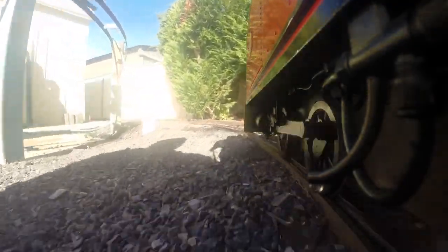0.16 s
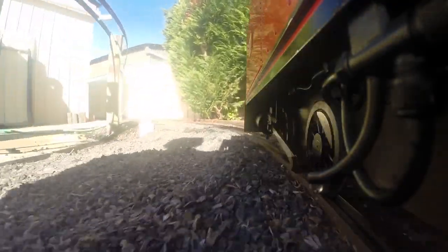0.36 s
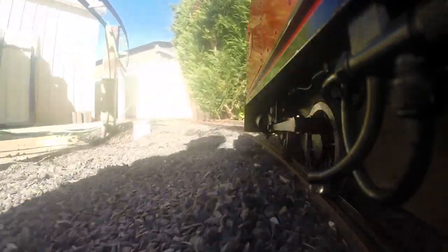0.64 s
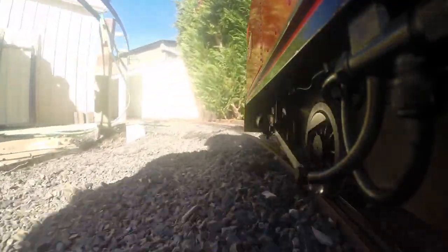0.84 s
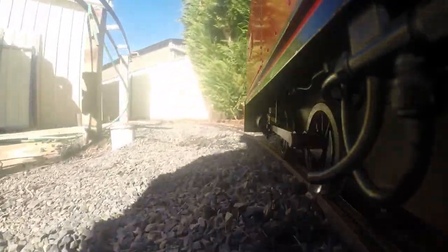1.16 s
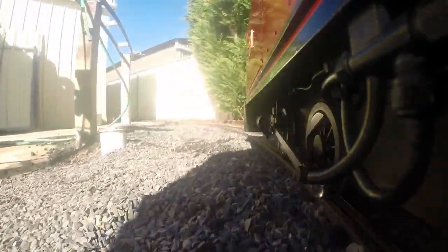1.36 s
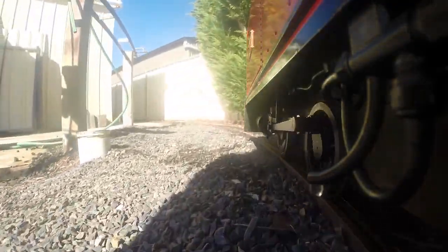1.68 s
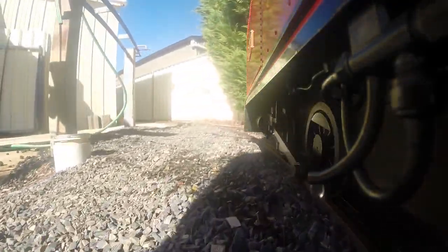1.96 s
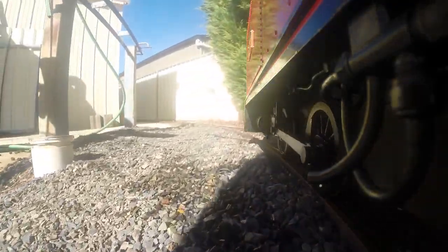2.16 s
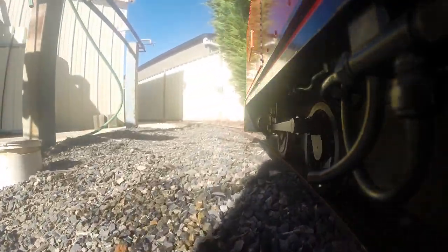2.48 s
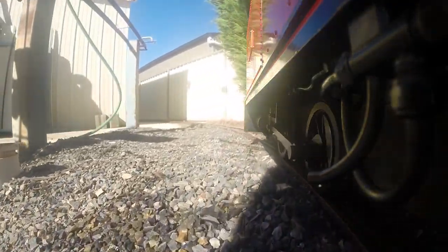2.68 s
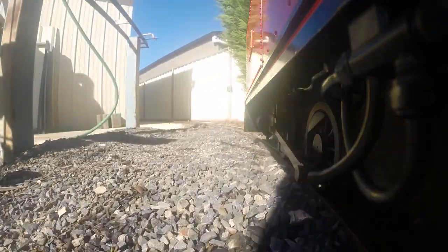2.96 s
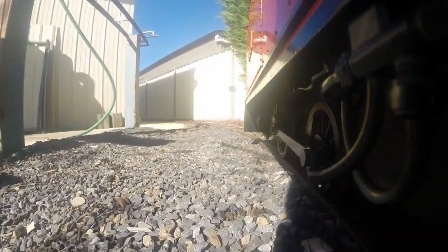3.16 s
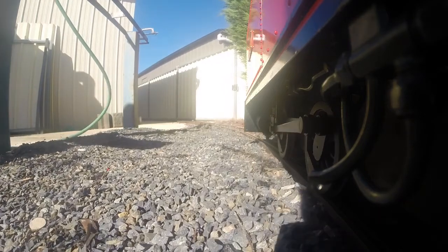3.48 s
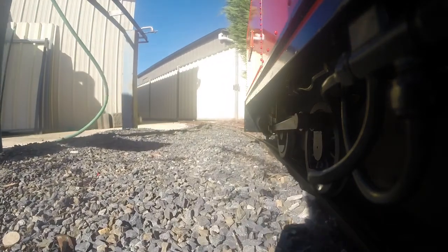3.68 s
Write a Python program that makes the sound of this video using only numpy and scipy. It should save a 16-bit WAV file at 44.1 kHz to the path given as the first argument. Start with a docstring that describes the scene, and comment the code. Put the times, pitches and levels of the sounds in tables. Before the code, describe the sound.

Close to the wheels outdoors, a small steam locomotive rumbles along the rails with busy metal clanks and cracking grit. The clanks become lighter and sparser, low thuds continue, and steam softly spits and hisses.

```python
"""Miniature steam locomotive rolling along a garden track, heard beside its wheels.
The wheels rumble through the frame, which sways on its springs and thuds at bumps. Loose rods and
couplings clank and rattle, grit cracks on the rail, rubbing steel squeaks briefly.
Steam spits and hisses louder as the clanking thins out."""
import sys
import numpy as np
from scipy import signal
from scipy.fft import rfft, irfft
from scipy.io import wavfile
from scipy.ndimage import uniform_filter1d

SR = 44100
rng = np.random.default_rng(int(sys.argv[2]) if len(sys.argv) > 2 else 0)


def put_to_file(sound):
    """Save the sound as 16-bit audio at rate SR, in the file named by the first command-line argument."""
    columns = np.atleast_2d(sound).T  # one column per channel
    safe = np.clip(columns, -1, 1)
    whole_steps = np.round(safe * 32767)
    wavfile.write(sys.argv[1], SR, whole_steps.astype(np.int16))


N = 168903
T = np.arange(N) / SR
HOLLOW_ABOVE_HZ = 360

# frame modes: f/Hz, level/dB, t60/s
FRAME_MODES = [(211.3, -7, 0.14), (263.4, 0.5, 0.061), (295.2, 2.5, 0.082), (398, -6.5, 0.053),
               (439.3, -5.5, 0.067), (509.7, -3, 0.041), (568.2, -12.5, 0.086), (649.6, -17.5, 0.077)]
# side plate modes: f/Hz, level/dB, t60/s
PLATE_MODES = [(925.3, -4.5, 0.15), (1017, -9, 0.23), (980, 3, .02), (1146, 5.5, 0.031), (1313, 2, 0.052),
               (1473, 2.5, 0.036), (1669, -6, 0.11)]
# steel running gear modes: f/Hz, level/dB, t60/s
GEAR_MODES = [(1984, -3.5, 0.046), (2400, -2.5, 0.014), (2510, 3.5, 0.025), (2920, -6.5, 0.014),
              (3370, -3, 0.014), (3475, -3.5, 0.014), (4016, -10, 0.027), (4990, -13.5, 0.021),
              (5460, -19, 0.053), (6800, -14, 0.009)]
# body jolt: f/Hz, level/dB
JOLT_SPECTRUM = [(20, -16), (45, -23.5), (65, -3), (88, 0.5), (112, 0.5), (140, 2), (175, -10), (300, 5.5),
                 (900, -75.5)]
# dry metal knock: f/Hz, level/dB
KNOCK_SPECTRUM = [(400, -29.5), (800, -17.5), (1250, 2), (1650, -2.5), (2000, 6.5), (2700, -2), (3100, -2),
                  (4000, -16), (4500, -23), (7000, -29)]
# treble loss in a steel contact: f/Hz, level/dB
CONTACT_SPECTRUM = [(4500, -0.5), (6000, -11.5), (7500, -5.5), (9500, -19), (15000, -32.5)]
# small rattles: t/s, level/dB
RATTLE_ENVELOPE = [(0, -32.5), (.5, -33.5), (.6, -41), (.75, -34.5), (.92, -35), (1.12, -41), (1.25, -38),
                   (1.5, -43), (2.0, -39.5), (2.6, -40.5), (3.0, -43), (3.83, -52)]


def undb(db):
    """Decibels to gain."""
    return 10 ** (np.asarray(db) / 20)


def unit(x):
    """Scale to rms 1."""
    return x / np.sqrt(np.mean(x ** 2))


def peak(x):
    """Scale to peak 1."""
    return x / np.abs(x).max()


def curve(rows):
    """Gain over time from rows of t/s, level/dB."""
    return undb(np.interp(T, *np.array(rows).T))


def walk(rate_hz):
    """Smooth random drift, rms 1."""
    hold = max(int(SR / rate_hz), 1)
    steps = np.repeat(rng.standard_normal(N // hold + 2), hold)
    return unit(uniform_filter1d(steps, hold)[:N])


def response(spectrum, size=8192):
    """Minimum-phase impulse response from rows of f/Hz, level/dB."""
    hz, db = np.array(spectrum).T
    bins_hz = np.arange(size // 2 + 1) * SR / size
    gain = undb(np.interp(np.log(bins_hz + 1), np.log(hz), db))
    cepstrum = irfft(np.log(gain))
    cepstrum[1:size // 2] *= 2
    cepstrum[size // 2 + 1:] = 0
    return irfft(np.exp(rfft(cepstrum)))


def ring(modes, size=8192):
    """Impulse response of damped modes, alternating in sign."""
    t = T[:size]
    return sum((-1) ** k * undb(db) * np.sin(2 * np.pi * hz * t) * np.exp(-np.log(1000) * t / t60_s)
               for k, (hz, db, t60_s) in enumerate(modes))


def frame_rings(modes):
    """Impulse responses of the low modes and the hollow upper modes."""
    return (ring([mode for mode in modes if mode[0] < HOLLOW_ABOVE_HZ]),
            ring([mode for mode in modes if mode[0] >= HOLLOW_ABOVE_HZ]))


def struck(modes, detune, scatter_db=3):
    """Modes with pitch and weight scattered by a random strike spot."""
    draws = rng.standard_normal((len(modes), 2))
    return [(hz * (1 + detune * a), db + scatter_db * b, t60_s)
            for (hz, db, t60_s), (a, b) in zip(modes, draws)]


def through(force, body):
    """Pass a force through a body."""
    return signal.fftconvolve(force, body)[:len(force)]


def strike(body, contact_s, chatter, size=1024):
    """One blow on a body: impulse plus brief contact chatter; peak 1."""
    age = T[:size] / contact_s
    force = rng.standard_normal(size) * np.sqrt(age) * np.exp(-age)
    force *= chatter / np.linalg.norm(force)
    force[0] += 1
    return peak(signal.fftconvolve(force, body))


def push(body, contact_s):
    """Body driven by a wheel rising over a bump and dropping back; peak 1."""
    t = T[:1024]
    force = np.gradient(t ** 2 * np.exp(-t / contact_s))
    return peak(through(body, force))


def knocks(rate_hz, spread_db=2):
    """Random train of small, uneven impacts."""
    impulses = (rng.random(N) < rate_hz / SR) * rng.choice([-1, 1], N)
    return impulses * undb(spread_db * np.minimum(rng.exponential(size=N), 4.5))


def add(out, start_s, x):
    """Mix x into out."""
    i = max(int(start_s * SR), 0)
    out[i:i + len(x)] += x[:N - i]


def rolling():
    """Rough rail makes the frame drone, rings the side plates and shakes the body."""
    # wheel rumble: t/s, level/dB
    rumble_envelope = [(0, -19.5), (.3, -19.5), (.55, -25), (.9, -18.5), (1.15, -27), (1.5, -24),
                       (1.7, -24.5), (2.1, -21.5), (2.35, -25.5), (2.45, -24), (2.65, -20), (2.9, -26.5),
                       (3.1, -24.5), (3.4, -29), (3.65, -32), (3.83, -30.5)]
    # hollow frame ring: t/s, level/dB
    hollow_envelope = [(0, -19.5), (.45, -25.5), (.9, -27), (1.3, -30.5), (2.6, -26.5), (3.1, -34.5),
                       (3.83, -40)]
    # low body shake: t/s, level/dB
    shake_envelope = [(0, -29.5), (.8, -30), (1.4, -32), (2.2, -24), (2.7, -24.5), (3.1, -28.5),
                      (3.83, -33.5)]
    flutter_db, plate_db = 2.5, -23
    low, upper = frame_rings(FRAME_MODES)
    drone = unit(through(knocks(rate_hz=700), low))
    hollow = unit(through(knocks(rate_hz=700) * undb(flutter_db * walk(rate_hz=24.95)), upper))
    shake = unit(through(knocks(rate_hz=600), response(JOLT_SPECTRUM)))
    plates = unit(through(knocks(rate_hz=1500), ring(PLATE_MODES)))
    rumble = curve(rumble_envelope) * (drone + undb(plate_db) * plates)
    return rumble + curve(hollow_envelope) * hollow + curve(shake_envelope) * shake


def boom():
    """The sprung body drones at one low, slightly wandering resonance."""
    # body boom: t/s, level/dB
    envelope = [(0, -18), (.14, -23), (.25, -33.5), (.68, -31), (.74, -19), (.9, -22), (.98, -25.5),
                (1.01, -34.5), (1.12, -22.5), (1.25, -29.5), (1.5, -42.5), (1.6, -22), (1.85, -30.5),
                (2.12, -37), (2.19, -20.5), (2.31, -40), (2.37, -21.5), (2.66, -16), (2.74, -31.5),
                (2.9, -14.5), (3.14, -36.5), (3.21, -20), (3.3, -26.5), (3.38, -18.5), (3.54, -27),
                (3.65, -21), (3.83, -38.5)]
    resonance_hz, wander, gain_db, flutter_db = 87.26, 0.0253, -1, 1
    hz = resonance_hz * (1 + wander * walk(rate_hz=30))
    tone = unit(np.sin(2 * np.pi * np.cumsum(hz) / SR))
    return tone * curve(envelope) * undb(gain_db - flutter_db * walk(rate_hz=22.46))


def rattles():
    """Flurries of small knocks in the gear and side plates."""
    flurry_db, gear_db, knock_db, plate_db = 2, -5.5, -5, -5
    force = knocks(rate_hz=420, spread_db=3.6) * undb(flurry_db * walk(rate_hz=35))
    steel = undb(gear_db) * unit(through(force, ring(GEAR_MODES)))
    steel += undb(knock_db) * unit(through(force, response(KNOCK_SPECTRUM)))
    steel += undb(plate_db) * unit(through(force, ring(PLATE_MODES)))
    return curve(RATTLE_ENVELOPE) * through(steel, response(CONTACT_SPECTRUM))


def steam():
    """A steam jet hisses through the resonances of its outlet."""
    # steam jet: f/Hz, level/dB
    jet_spectrum = [(500, 12), (1150, -24.5), (1500, -3.5), (1900, 2.5), (2900, -3.5), (3450, -1.5),
                    (3700, -4), (3930, 2.5), (4500, -16), (5150, -3), (5500, -8), (6200, -17),
                    (7250, -19.5), (7550, -9), (8200, -20.5), (10700, -23), (11900, -27.5), (13200, -28),
                    (14900, -28.5), (15600, -52)]
    # escaping steam: t/s, level/dB
    envelope = [(0, -44.5), (1.3, -49.5), (1.7, -44), (2.1, -39.5), (2.4, -36), (2.7, -39.5), (3.0, -36.5),
                (3.83, -37)]
    return unit(through(rng.standard_normal(N), response(jet_spectrum))) * curve(envelope)


def clanks():
    """Slack rods and couplings knock and rebound once; gear, plates and one loose rod ring."""
    # blows: t/s, level/dB, plate offset/dB, f favoured by the struck spot/Hz
    blows = [(.0508, -14, -2, 3400), (0.0977, -19, -20, 2500), (0.1202, -15, -24, 2000),
             (0.127, -10.5, -16, 1900), (.1325, -7.5, -24, 3240), (0.1406, -14, -25, 2400),
             (0.2507, -11.5, -2.5, 2450), (0.365, -12, 0, 2000), (0.3699, -4, -23, 2530),
             (0.463, -17.5, 2, 2450), (0.4817, -10.5, -2.5, 2100), (0.5292, -3, -30, 2660),
             (.532, -14, -20, 3440), (0.5554, -11, -4.5, 2630), (0.6443, -13, -2, 2530),
             (0.693, -13.5, -28, 3400), (0.71, -7, -17, 2530), (0.7182, -7.5, -1.5, 2400),
             (.731, -12, -23, 3400), (0.8542, -16.5, -15, 2600), (.8634, -13.5, -4, 2510),
             (0.8862, -14, -7, 2000), (0.9496, -16, -16, 2900), (1.0138, -4.5, -12, 2520),
             (1.0213, -5.5, -31, 2680), (1.0251, -3, -28, 2540), (1.0275, -10, -26, 2540),
             (1.042, -5, -20, 2600), (1.0656, -20, -2, 2500), (1.0872, -16, -4, 2550),
             (1.0942, -18, -8, 2450), (1.1474, -19.5, 1, 3500), (1.188, -6.5, -19, 2480),
             (1.2083, -15.5, -22, 2550), (1.571, -16.5, 2, 2410), (1.6452, -15, -2, 2270),
             (1.8133, -13.5, -15, 2620), (1.8827, -18.5, -3, 2040), (1.991, -23.5, 2.5, 2930),
             (2.081, -19.5, -9, 2590), (2.2294, -21, -2, 2300), (2.2537, -18, -3, 2610),
             (2.386, -11.5, -0.5, 2550), (2.615, -14.5, -7, 2800), (2.6385, -12.5, -2, 2400),
             (2.669, -25, 1, 2400), (2.703, -17, -13, 1920), (2.7892, -19.5, 1.5, 2300),
             (2.8838, -18, -2.5, 2090), (2.9778, -19, -4.5, 2500), (3.2945, -18.5, -5, 1960),
             (3.2968, -21, -21, 3350), (3.5485, -18, 1.5, 2530), (3.737, -22, -7, 2920)]
    # loose rod modes: f/Hz, level/dB, t60/s
    rod_modes = [(1874, 3.5, 0.25), (2290, -7, .2), (2280, 1.5, 0.15)]
    # blows on the rod: t/s, level/dB
    rod_hits = [(0.132, -17), (0.532, -20), (0.719, -22)]
    gain_db, plate_trim_db, knock_db, rebound_db = -2.5, -2.5, -8.5, -11
    spot_db_per_octave, mean_rebound_s = 12.5, 0.005
    out, plate, knock = np.zeros(N), ring(PLATE_MODES), response(KNOCK_SPECTRUM)
    for start_s, db, plate_db, spot_hz in blows:
        gear = ring([(hz, mode_db - spot_db_per_octave * abs(np.log2(hz / spot_hz)), t60_s)
                     for hz, mode_db, t60_s in struck(GEAR_MODES, detune=0.03)])
        gear_db = 1.5 + 0.17 * db  # light blows stay drier
        gain = undb(db + gain_db)
        for body, part_db in (gear, gear_db), (plate, plate_db + plate_trim_db):
            add(out, start_s, gain * undb(part_db) * strike(body, contact_s=0.0011, chatter=1.35))
        rebound_s = start_s + mean_rebound_s * (0.5 + rng.random())
        for hit_s, hit_db in (start_s, knock_db), (rebound_s, rebound_db):
            add(out, hit_s, gain * undb(hit_db) * strike(knock, contact_s=0.0019, chatter=3.7))
    for start_s, db in rod_hits:
        add(out, start_s, undb(db) * peak(ring(rod_modes)))
    return through(out, response(CONTACT_SPECTRUM))


def bumps():
    """Wheels ride over bumps: the frame thuds and knocks, the heavier body jolts more slowly."""
    # track bumps: t/s, level/dB, jolt offset/dB, hollow knock offset/dB
    track_bumps = [(0.068, -12.5, -16, 8.5), (0.251, -6, -29, -4), (0.29, -1.5, -19, -2.5),
                   (0.325, -2, -20, -5), (0.384, 1.5, -33, -11.5), (0.412, -4, -21, -21),
                   (0.449, -2, -28, -8), (0.47, 4.5, -29, -14), (0.494, -3.5, -27, -22),
                   (0.533, 0.5, -27, -23), (0.587, -4.5, -27, -16), (0.856, -10, -31, -8.5),
                   (0.9, -1, -17, -10.5), (1.026, -3.5, -17, -16), (1.07, -10, -20, -23),
                   (1.54, -6.5, -2, -27.5), (1.573, -2, -1.5, -19), (1.647, 5.5, -27, -40),
                   (1.709, -11.5, 0, -7), (1.873, -3.5, 1, -9), (1.956, -5.5, -21, -25),
                   (2.046, -5.5, -1, -19), (2.232, -2.5, 2, -17), (2.342, -11.5, 3, -3.5),
                   (2.385, 2, -12, -18), (2.475, -13, -18, 0), (2.639, 1, -6, -5), (2.725, -5.5, -7, -3.5),
                   (2.768, -5.5, -14, -7.5), (2.882, -11, -13, -3), (2.975, -10, 0.5, -3.5),
                   (3.212, -7, 0, -11.5), (3.548, -18, 3, 3.5)]
    gain_db, jolt_trim_db, hollow_trim_db, frame_contact_s = -7.5, 0.5, 4.5, 0.00019
    out, jolt = np.zeros(N), push(response(JOLT_SPECTRUM), contact_s=0.00075)
    for start_s, db, jolt_db, hollow_db in track_bumps:
        low, upper = frame_rings(struck(FRAME_MODES, detune=0.015))
        thud = push(low, frame_contact_s)
        hollow = undb(hollow_db + hollow_trim_db) * push(upper, frame_contact_s)
        add(out, start_s, undb(db + gain_db) * (thud + hollow + undb(jolt_db + jolt_trim_db) * jolt))
    return out


def grit():
    """Small stones crack between wheel and rail; finer grains tick while the gear rattles."""
    # stone cracks: t/s, level/dB
    cracks = [(0.106, -25), (.120, -18.5), (0.129, -15), (.132, -15), (0.144, -23), (0.322, -20.5),
              (0.359, -32), (0.508, -21.5), (0.515, -23), (0.552, -22.5), (0.703, -33.5), (0.72, -24.5),
              (.732, -34), (0.889, -29), (.960, -23), (1.149, -26.5), (1.645, -34.5)]
    # cracking grit: f/Hz, level/dB
    crack_spectrum = [(800, -25.5), (2500, 5.5), (4000, 2.5), (4500, 3), (5000, 0.5), (5700, -2),
                      (6800, -20), (9000, -18.5), (12000, -34.5), (13300, -26), (14300, -27.5),
                      (15000, -18), (15600, -43.5)]
    crack_db, grains_db = 3, -23
    out, crack = np.zeros(N), response(crack_spectrum)
    for start_s, db in cracks:
        add(out, start_s, undb(db + crack_db) * strike(crack, contact_s=0.003, chatter=13))
    tick = through(crack, response(CONTACT_SPECTRUM))
    grains = unit(through(knocks(rate_hz=260, spread_db=7.5), tick))
    return out + undb(grains_db) * curve(RATTLE_ENVELOPE) * grains


def squeaks():
    """Steel slips on steel with a brief falling squeak."""
    # slips: t/s, length/s, start f/Hz, level/dB
    slips = [(1.574, 0.012, 1300, -26), (2.225, 0.019, 1180, -33), (2.642, 0.013, 1270, -24.5),
             (3.522, .024, 2260, -30.5)]
    fall, roughness = 0.2, 0.077
    out = np.zeros(N)
    for start_s, length_s, start_hz, db in slips:
        progress = np.linspace(0, 1, int(length_s * SR))
        hz = start_hz * (1 - fall * progress + roughness * walk(rate_hz=380)[:len(progress)])
        swell = np.sqrt(4 * progress * (1 - progress))
        add(out, start_s, undb(db) * swell * np.sin(2 * np.pi * np.cumsum(hz) / SR))
    return out


def spits():
    """Soft puffs of wet steam from the cylinder swell and die away."""
    # puffs: t/s, length/s, level/dB
    puffs = [(1.686, 0.025, -43), (2.067, 0.041, -43), (2.445, 0.025, -39), (2.554, 0.095, -42)]
    # wet steam: f/Hz, level/dB
    puff_spectrum = [(2000, -3), (4500, 4), (8800, -20), (11000, -26)]
    gate = np.zeros(N)
    for start_s, length_s, db in puffs:
        add(gate, start_s, undb(db) * np.sin(np.linspace(0, np.pi, int(length_s * SR))))
    return gate * unit(through(rng.standard_normal(N), response(puff_spectrum)))


def scene():
    """All sources, close, in mono."""
    body = rolling() + boom() + bumps()
    steel_and_grit = clanks() + rattles() + grit() + squeaks()
    return (body + steel_and_grit + spits() + steam())[None]


def record(dry):
    """Soft-clip the peaks, then low-pass."""
    top_hz = 15200
    rounded = np.tanh(0.86 * dry) / 0.81
    return signal.sosfilt(signal.ellip(8, 0.2, 70, top_hz, fs=SR, output="sos"), rounded)


dry = scene()
out = record(dry)
put_to_file(out)
```